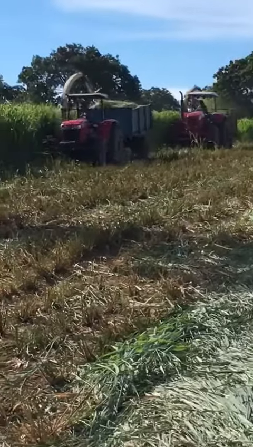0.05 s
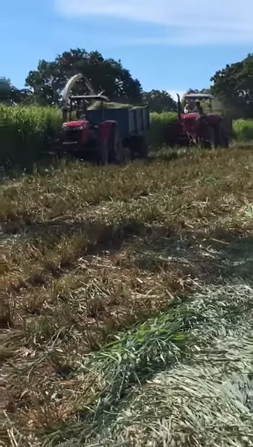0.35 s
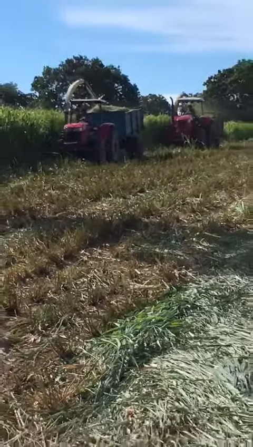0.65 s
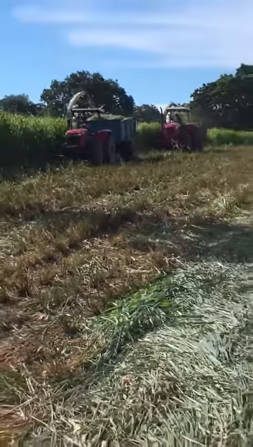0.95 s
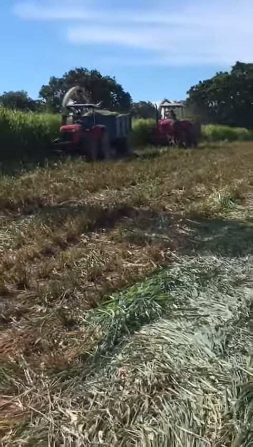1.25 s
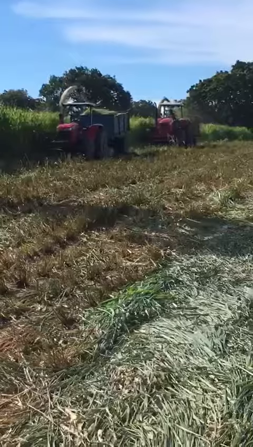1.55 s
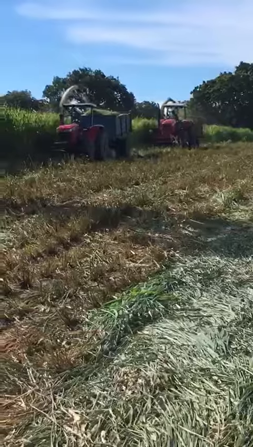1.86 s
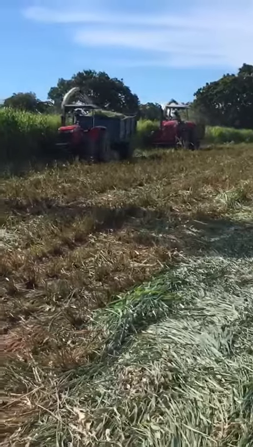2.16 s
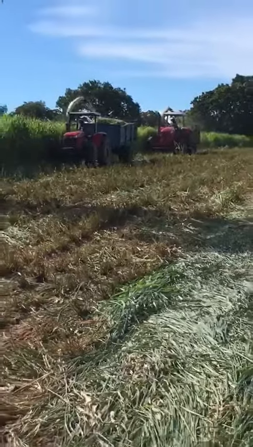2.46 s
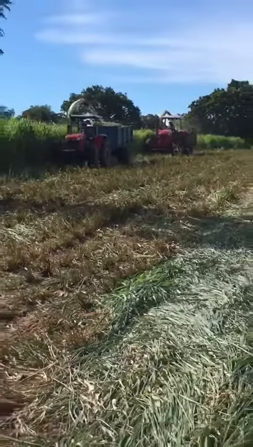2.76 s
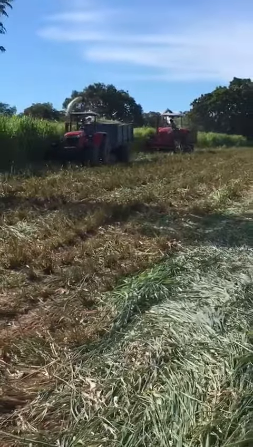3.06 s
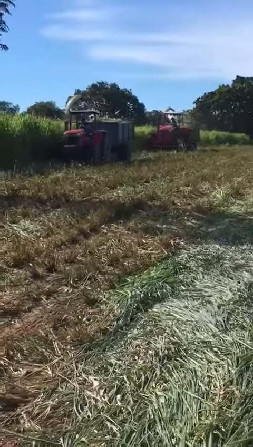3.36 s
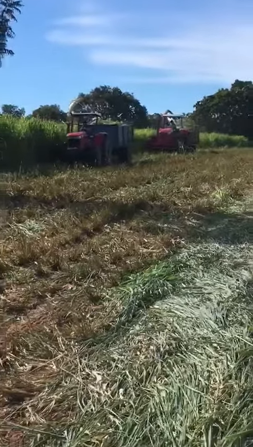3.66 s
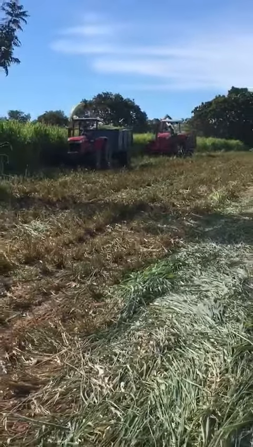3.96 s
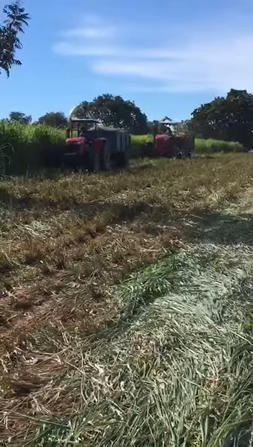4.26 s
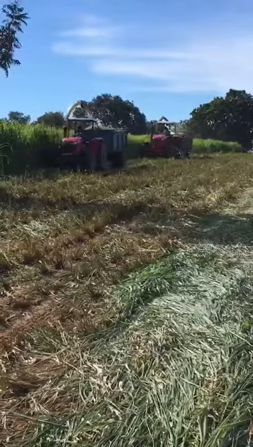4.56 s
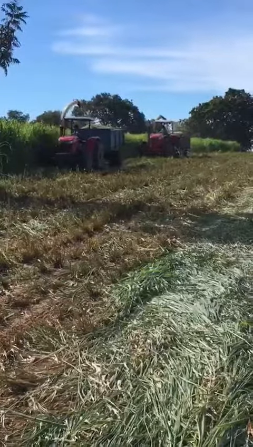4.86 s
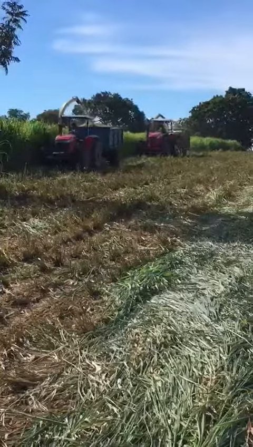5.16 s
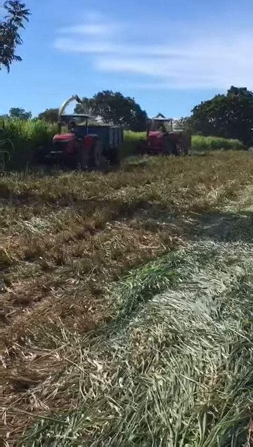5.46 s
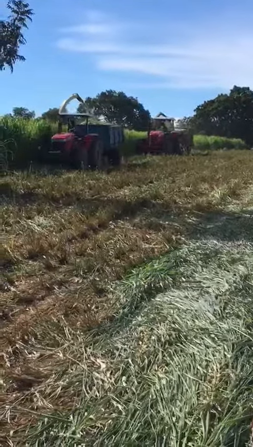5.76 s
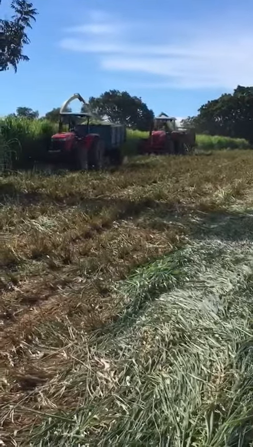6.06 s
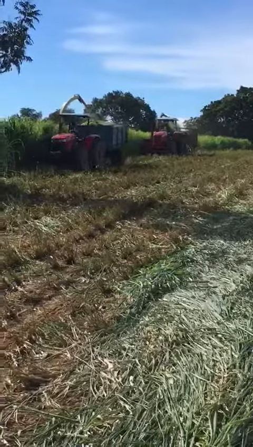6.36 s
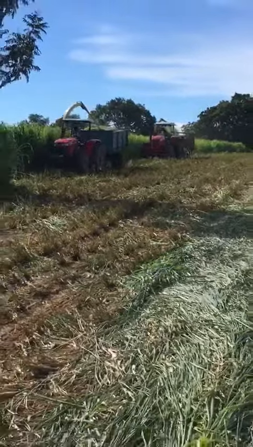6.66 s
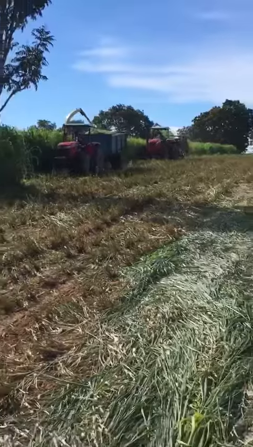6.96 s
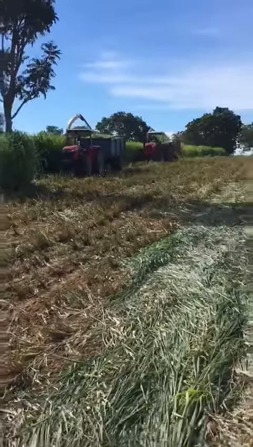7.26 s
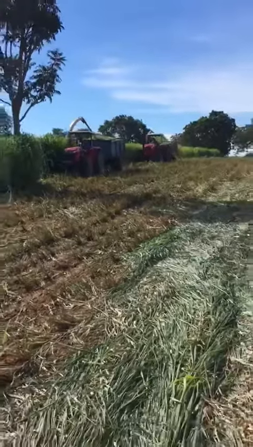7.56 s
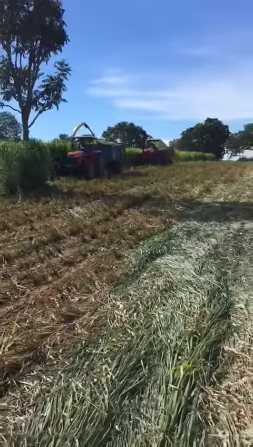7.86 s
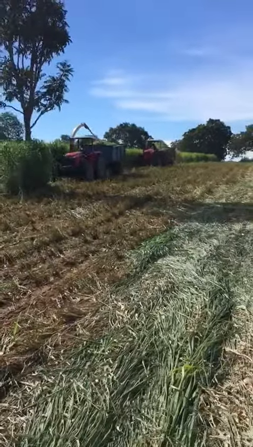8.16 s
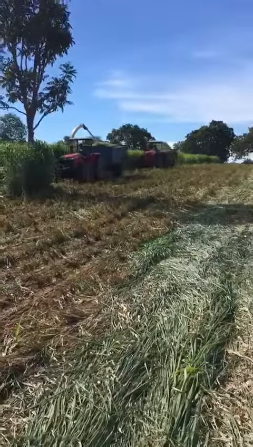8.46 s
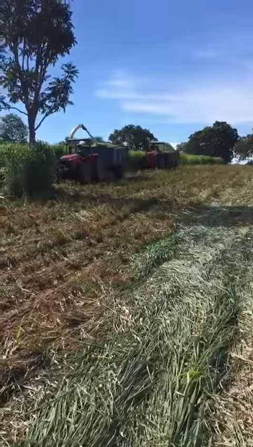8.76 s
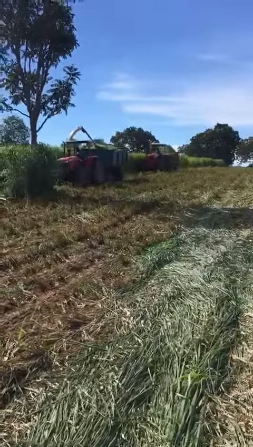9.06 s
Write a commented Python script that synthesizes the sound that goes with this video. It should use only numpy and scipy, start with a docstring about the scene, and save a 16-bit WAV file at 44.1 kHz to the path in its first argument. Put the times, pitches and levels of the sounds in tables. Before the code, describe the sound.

A diesel tractor drones steadily as it drives a forage harvester through tall grass, with a second tractor faint behind it. The cutter whirs and rings, sheet metal clatters, the blower howls in swells and chopped grass hisses up the spout. The machines work some way off across an open field, creeping slightly nearer, while dry stalks now and then snap close to the microphone.

```python
"""Forage harvesting across a field

The microphone stands in dry stubble, whose stalks crackle close by. Some 44 m off and creeping nearer,
a tractor drives a forage harvester through tall grass; a second tractor hauls the trailer. The
four-cylinder diesel drones and sags under the crop, and the cutter flywheel, the blower's howl and a
belt-driven shaft follow its speed. Sheet metal clatters and chopped grass hisses up the spout."""
import sys
import numpy as np
from scipy import signal
from scipy.fft import rfft, irfft, next_fast_len
from scipy.io import wavfile

SR = 44100
rng = np.random.default_rng(int(sys.argv[2]) if len(sys.argv) > 2 else 0)


def to_wav(sig):
    """Store sig (one row per channel, or 1-D mono) as 16-bit WAV at the path in sys.argv[1].

    Samples outside -1..1 are clipped; the rate is SR.
    """
    pcm = np.clip(np.atleast_2d(sig), -1, 1) * 32767
    pcm = np.round(pcm).astype(np.int16)
    wavfile.write(sys.argv[1], SR, pcm.T)  # frames by channels


N = 406161
TIME = np.arange(N) / SR

# thick wads of crop drag the diesel's firing rate down: deepest_s, sag_hz, half_length_s
CROP_WADS = [(0, 1.0, .17), (0.8, 1.7, .24), (1.15, .9, .15), (1.48, .8, .24), (2.48, 1.7, .19),
             (6.69, .85, .2), (7.26, 1.6, .25), (7.8, 1.0, .25), (8.6, .2, .2), (9.1, .45, .25)]
# the governor overshoots now and then: peak_s, rise_hz, half_length_s
GOVERNOR_OVERSHOOTS = [(2.0, 1.0, .15), (5.24, .9, .14), (5.88, .35, .15)]
# exhaust harmonics of the harvesting and the hauling tractor: multiple, relative_db
HARVESTER_EXHAUST = [(1, -3), (1.5, -23), (2, -6), (2.5, -29), (3, -19), (3.5, -23), (4, -17.5)]
HAULER_EXHAUST = [(1, -38.5), (2, -44.5)]
# spectra of engine rumble, cutter clatter and grass in the spout: frequency_hz, relative_db
RUMBLE_SPECTRUM = [(22, -24.5), (35, -16.5), (55, -9), (90, -6.5), (125, -9), (160, 1.5), (220, -1),
                   (270, -2.5), (320, -6.5), (370, -7), (415, -16.5), (520, -20)]
CLATTER_SPECTRUM = [(350, -21.5), (470, -6), (570, -0.5), (730, -6.5), (850, -5), (1000, -2), (1220, 1),
                    (1600, -5), (1860, -5), (2050, -8.5), (2450, -7), (3050, -10), (3800, -13.5),
                    (6000, -46)]
HISS_SPECTRUM = [(2500, 0), (3850, -4.5), (4250, 2.5), (4900, -0.5), (5400, 1.5), (6600, 0), (7550, -3),
                 (8300, -2), (9600, -4), (10150, -7.5), (10450, -18.5)]
# how hard the cutter works, as its clatter at the starting distance: time_s, level_db
CHOPPING_LOAD = [(0, -34), (0.7, -34), (2.15, -35), (3.4, -34), (5.0, -33.5), (7.2, -32.5), (9.21, -33.5)]
# sheet-metal panels ringing under the clatter: pitch_hz, width_hz, relative_db
PANEL_MODES = [(818, 36, -5), (1210, 38, -13.5), (1757, 43, -11.5), (1863, 62, -4), (1965, 90, -5),
               (2206, 90, -3.5), (2457, 83, -3), (2670, 76, -8.5), (2800, 75, -7), (2980, 88, -8),
               (3100, 60, -10), (3340, 71, -6)]
# the knives' high ring: multiple, relative_db
KNIFE_RING_ORDERS = [(12, -11), (16, -12), (20, -14), (22, -16), (28, -16.5)]
# knife overtones at the starting distance: time_s, growl_db, middle_db, whine_db, ring_db
KNIFE_LEVELS = [(0, -39.5, -53, -46, -48), (0.55, -35.5, -48, -43.5, -39), (1.0, -44, -56, -42.5, -42),
                (1.45, -50, -49, -44, -48), (2.05, -36.5, -54, -50, -57), (2.9, -41, -51, -45, -41),
                (3.7, -36, -48, -38.5, -45), (4.3, -37.5, -51, -44, -47), (4.8, -43.5, -48, -48, -40.5),
                (5.7, -45, -59, -46.5, -40), (6.2, -44, -55, -43.5, -47), (6.8, -37.5, -50, -51, -43),
                (7.25, -40.5, -42.5, -43.5, -38), (7.75, -47, -47.5, -40, -49), (8.2, -47, -53, -45.5, -42),
                (8.7, -38.5, -47, -38, -45), (9.21, -38.5, -48, -46, -41)]
# hum of the belt-driven shaft: multiple, relative_db
SHAFT_HARMONICS = [(1, -3), (2, -23.5), (4, -26.5)]
# pace of the shaft's throb: time_s, rate_hz
SHAFT_THROB_RATE = [(0, 2.9), (2.2, 2.25), (5.8, 2.25), (6.6, 2.75), (9.21, 2.75)]
# the shaft's hum at the starting distance: time_s, level_db, throb_depth (0-1)
SHAFT_LEVELS = [(0, -32.5, 0), (1.1, -32.5, 0.6), (2.3, -30.5, 0.3), (4.2, -35, 0.62), (5.8, -31, 0.2),
                (6.3, -35, 0.4), (7.0, -33.5, 0.8), (8.1, -30, 0.6), (9.21, -36, 0.8)]
# batches of crop in the blower, as its howl at the starting distance: start_s, length_s, level_db
CROP_BATCHES = [(0.112, 0.75, -37.5), (0.8, 1.03, -42.5), (1.99, 0.79, -38.5), (2.8, 0.61, -44),
                (3.257, 0.26, -35), (3.546, 1.06, -38.5), (4.748, 0.32, -33.5), (5.18, 0.29, -35),
                (5.45, 0.26, -38), (5.65, 0.45, -34.5), (6.083, 0.29, -34.5), (6.32, 0.4, -39),
                (6.577, 0.36, -34), (6.917, 0.96, -37), (7.84, 0.91, -39), (8.77, 0.21, -27.5),
                (8.98, 0.37, -41)]
# side tones beating with the howl, the first one rotor turn below it: pitch_ratio, relative_db
HOWL_SIDE_TONES = [(0.917, 0), (1.045, -3)]
# their swells at the starting distance: peak_s, level_db, half_length_s
HOWL_SIDE_SWELLS = [(1.05, -50, 0.2), (6.1, -48.5, 0.27), (7.25, -48, 0.39)]
# tough stems rasping, at the starting distance: peak_s, level_db, half_length_s, centre_hz
TOUGH_STEMS = [(0.945, -44, 0.71, 2840), (4.2, -48, 0.49, 2520), (5.25, -47, 0.73, 2260),
               (5.75, -42.5, 0.29, 2500), (6.17, -40, 0.15, 1850), (7.2, -44.5, 0.55, 2040)]
# stalks snapping by the microphone: start_s, relative_db, length_s, squeak_hz, squeak_q, crunch_db
STALK_SNAPS = [(1.343, -32.5, 0.025, 8400, 5.4, -2), (1.585, -39, 0.044, 8000, 1, -2),
               (1.937, -42, 0.035, 6500, 1, 0), (2.38, -37.5, 0.016, 3940, 0.83, 1),
               (2.972, -39, 0.06, 8800, 3, 0), (3.05, -25, 0.0075, 6560, 3.5, -4),
               (3.054, -38, .016, 7000, 4, 3), (3.070, -27.5, 0.017, 6500, 16, -8),
               (3.077, -32, 0.014, 6700, 3, -5), (3.082, -32.5, 0.036, 2700, 3.8, -6),
               (3.847, -41, 0.035, 6000, 9, 0), (4.002, -30.5, 0.018, 6550, 10, -12),
               (4.341, -40, 0.03, 8000, 1, -2), (4.594, -36.5, 0.036, 6500, 4, 2),
               (4.648, -38, .025, 6300, 8, -6), (5.68, -41, 0.088, 8500, 3, 0),
               (8.526, -37, 0.049, 8000, 1.08, -1), (9.103, -40, 0.027, 7000, 1.2, 3)]
# their broad crunch: frequency_hz, relative_db
CRUNCH_SPECTRUM = [(900, 7.5), (2800, 6.0), (4500, -2.0), (8000, -2.0), (10400, -21)]


def from_db(db):
    """Decibels to gain."""
    return 10 ** (np.asarray(db) / 20)


def rms_one(x):
    """Scale to unit power."""
    return x / np.sqrt(np.mean(x ** 2) + 1e-20)


def in_time(rows):
    """One curve for each column after a table's times."""
    times, *columns = np.transpose(rows)
    return [np.interp(TIME, times, column) for column in columns]


def bumps(rows):
    """A smooth rise and fall for each (peak_s, height, half_length_s)."""
    return sum(height * np.exp(-((TIME - peak_s) / half_s) ** 2) for peak_s, height, half_s in rows)


def drift(rate_hz):
    """Smooth random wander of spread 1 that changes at about the given rate."""
    step, settle = 40, 2000
    pole = np.exp(-2 * np.pi * step * rate_hz / SR)
    noise = rng.standard_normal(N // step + settle + 2)
    slow = signal.lfilter([1], [1, -2 * pole, pole * pole], noise)[settle:]
    return np.interp(np.arange(N) / step, np.arange(len(slow)), rms_one(slow))


def angle(hz):
    """Running phase of something that turns at hz."""
    return 2 * np.pi * np.cumsum(hz) / SR + rng.uniform(0, 2 * np.pi)


def coloured(x, spectrum):
    """Shape a sound to a spectrum, falling 20 dB an octave past its ends; unit power."""
    size = next_fast_len(N)
    hz, db = np.transpose(spectrum)
    octave = np.log2(np.arange(size // 2 + 1) * SR / size + 1)
    beyond = np.abs(octave - np.clip(octave, np.log2(hz[0]), np.log2(hz[-1])))
    gain = from_db(np.interp(octave, np.log2(hz), db) - 20 * beyond)
    return rms_one(irfft(rfft(x, size) * gain, size)[:N])


def hum(hz, orders=((1, 0),), *, flutter, flutter_hz):
    """Harmonics of a turning part; moving air and uneven load blur the higher ones more."""
    phase, out = angle(hz), 0
    for multiple, db in orders:
        turn = multiple * phase + rng.uniform(0, 2 * np.pi)
        blur = flutter * multiple
        tone = (1 + blur * drift(flutter_hz)) * np.sin(turn) + blur * drift(flutter_hz) * np.cos(turn)
        out = out + from_db(db) * rms_one(tone)
    return out


def grains(per_s, spread_db):
    """Random clicks of uneven size; unit power."""
    sizes = from_db(spread_db * np.minimum(rng.exponential(1, N), 4))
    return rms_one(sizes * rng.standard_normal(N) * (rng.random(N) < per_s / SR))


def exhausts(firing_hz, nearness):
    """Firing pulses drone from both tractors; the fainter hauler holds a nearly steady speed."""
    hauler_hz = 112 + 0.597 * drift(0.309)
    harvester = hum(firing_hz, HARVESTER_EXHAUST, flutter=0.037, flutter_hz=5.6)
    hauler = hum(hauler_hz, HAULER_EXHAUST, flutter=0.11, flutter_hz=3.3)
    return nearness ** 1.68 * from_db(-25.5) * harvester + hauler


def rumble():
    """Uneven combustion and shaking panels fill the space between the low harmonics."""
    return coloured(rng.standard_normal(N), RUMBLE_SPECTRUM) * from_db(1.6 * drift(8.4))


def clatter(firing_hz, knife_hz):
    """Diesel knock and chopping swell with each firing and cut, and sound through the metal housing."""
    beat = 1 + 0.05 * np.cos(angle(firing_hz)) + 0.076 * np.cos(angle(2 * knife_hz))
    housing = panels(coloured(beat * rng.standard_normal(N), CLATTER_SPECTRUM))
    low = signal.sosfiltfilt(signal.butter(2, 1600, fs=SR, output="sos"), housing)
    high = housing - low
    tilt_db = 2 - 0.25 * TIME  # dulls steadily as the machines turn
    return low * from_db(-tilt_db + 0.5 * drift(23.0)) + high * from_db(tilt_db + drift(19.0))


def panels(shaking):
    """Each panel adds a narrow ring to what shakes it, harder or softer as the machine rocks along."""
    rings = 0
    for hz, width_hz, db in PANEL_MODES:
        swell_db = 4.5 * np.clip(drift(2.0), -2, 1)
        ring = signal.lfilter(*signal.iirpeak(hz, hz / width_hz, fs=SR), shaking)
        rings = rings + from_db(db + swell_db) * ring
    return rms_one(shaking + rings)


def crop_hiss(firing_hz):
    """Countless bits of grass strike the spout; coarse and fine bits come in clumps of their own."""
    feed = 1 + 0.05 * np.cos(angle(firing_hz))
    hiss = coloured(feed * grains(per_s=32000, spread_db=0.6), HISS_SPECTRUM)
    coarse = signal.sosfiltfilt(signal.butter(3, 6500, fs=SR, output="sos"), hiss)
    fine = hiss - coarse
    return coarse * from_db(1.5 * drift(10.4)) + fine * from_db(drift(13.0))


def cutter(knife_hz, nearness):
    """The knives drone and ring; each low overtone swells in its own way along the row."""
    growl_db, middle_db, whine_db, ring_db = in_time(KNIFE_LEVELS)
    drone = from_db(-36.5) * hum(knife_hz, flutter=0.3, flutter_hz=6.5)
    growl = from_db(growl_db) * hum(knife_hz, [(2, 0)], flutter=0.12, flutter_hz=10.4)
    middle = from_db(middle_db) * hum(knife_hz, [(6, 0)], flutter=0.096, flutter_hz=8.7)
    whine = from_db(whine_db) * hum(knife_hz, [(8, 0)], flutter=0.11, flutter_hz=30.0)
    ring = from_db(ring_db) * hum(knife_hz, KNIFE_RING_ORDERS, flutter=0.089, flutter_hz=11.5)
    return drone + nearness * (growl + middle + whine + ring)


def shaft(shaft_hz):
    """The shaft's hum throbs two or three times a second, by turns shallow and deep."""
    throb_hz, = in_time(SHAFT_THROB_RATE)
    level_db, depth = in_time(SHAFT_LEVELS)
    cycles = np.cumsum(throb_hz) / SR
    cycles -= np.interp(0.22, TIME, cycles)  # first crest at 0.22 s
    throb = rms_one(1 + depth * np.cos(2 * np.pi * cycles))
    return from_db(level_db) * throb * hum(shaft_hz, SHAFT_HARMONICS, flutter=0.29, flutter_hz=5.1)


def blower(knife_hz):
    """The housing howls at four times the knife rate, louder while a batch of crop goes through."""
    attack_s, release_s = 0.11, 0.28
    level = from_db(-49)  # idling
    for start_s, length_s, db in CROP_BATCHES:
        edges = np.minimum((TIME - start_s) / attack_s, (start_s + length_s - TIME) / release_s)
        level = np.maximum(level, from_db(db) * np.clip(edges + 0.5, 0, 1))
    howl_hz = 4 * knife_hz + 1.8 * drift(7.0)
    tumbling = 1 + 0.13 * drift(49.0)  # crop in the housing roughens the howl
    swells = bumps([(peak_s, from_db(db), half_s) for peak_s, db, half_s in HOWL_SIDE_SWELLS])
    sides = sum(from_db(db) * hum(ratio * howl_hz, flutter=0.57, flutter_hz=13.0)
                for ratio, db in HOWL_SIDE_TONES)
    howl = hum(howl_hz, flutter=0.26, flutter_hz=20.0)
    return level * tumbling * howl + (from_db(-52) + swells) * sides


def rasp(knife_hz):
    """Tough stems set a dense row of knife overtones ringing, each time about another pitch."""
    orders = [(multiple, 0) for multiple in np.arange(11, 21.5, 0.5)]
    overtones = hum(knife_hz, orders, flutter=0.23, flutter_hz=5.8)
    out, edge_ratio = 0, 2 ** 0.11
    for peak_s, db, half_s, hz in TOUGH_STEMS:
        band = signal.butter(2, [hz / edge_ratio, hz * edge_ratio], "band", fs=SR, output="sos")
        out = out + bumps([(peak_s, from_db(db), half_s)]) * rms_one(signal.sosfilt(band, overtones))
    return out


def stalks():
    """Close by, fibres crack in bursts, a squeak over a broad crunch; leaves brush around each snap."""
    out, cracks = np.zeros(N), grains(per_s=14000, spread_db=1.0)
    crunch = from_db(5.5) * coloured(cracks, CRUNCH_SPECTRUM)
    brush_db, brush_half_s = -22, 0.056
    for start_s, db, length_s, squeak_hz, q, crunch_db in STALK_SNAPS:
        span = slice(int((start_s - 0.15) * SR), min(N, int((start_s + 0.25) * SR)))
        since_s = TIME[span] - start_s
        age = np.maximum(since_s, 0) / length_s
        snap = np.sqrt(2 * np.e * age) * np.exp(-np.e * age ** 2)
        brush = from_db(brush_db) * np.exp(-((since_s - length_s / 2) / brush_half_s) ** 2)
        squeal = signal.lfilter(*signal.iirpeak(squeak_hz, max(q, 1), fs=SR), cracks[span])
        fibres = rms_one(squeal) + from_db(crunch_db) * crunch[span]
        out[span] += from_db(db - 4.5) * np.maximum(snap, brush) * fibres
    return out


def squeak(peak_s=6.435, level_db=-35, half_s=0.015, pitch_hz=712):
    """One short, rough squeak, perhaps from the trailer's hitch."""
    tone = hum(np.full(N, pitch_hz), flutter=0.3, flutter_hz=40.0)
    return bumps([(peak_s, from_db(level_db), half_s)]) * tone


def scene():
    """The harvester creeps toward the microphone, its turning parts following the diesel's speed."""
    start_m, approach_m_per_s, governed_hz = 44.4, 1.14, 65.85
    nearness = start_m / (start_m - approach_m_per_s * TIME)
    firing_hz = governed_hz - bumps(CROP_WADS) + bumps(GOVERNOR_OVERSHOOTS)
    knife_hz, shaft_hz = 2.338 * firing_hz, 4.3 * firing_hz
    clatter_db, = in_time(CHOPPING_LOAD)
    load_db = clatter_db - clatter_db.mean()
    drones = exhausts(firing_hz, nearness) + cutter(knife_hz, nearness)
    tones = blower(knife_hz) + rasp(knife_hz) + shaft(shaft_hz)
    roar = from_db(-31.5) * rumble() + from_db(clatter_db) * clatter(firing_hz, knife_hz)
    grass = from_db(-40.5 + 1.16 * load_db) * crop_hiss(firing_hz)
    return (drones + nearness * (tones + roar + grass) + squeak() + stalks())[None]


def record(dry):
    """One microphone, with the treble cut steeply above 10.4 kHz."""
    return signal.sosfilt(signal.ellip(12, 0.1, 90, 10400, fs=SR, output="sos"), dry)


dry = scene()
out = record(dry)
to_wav(out)
```